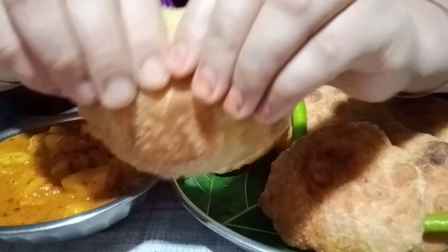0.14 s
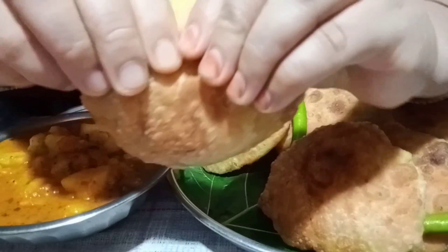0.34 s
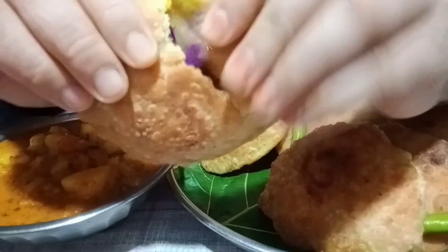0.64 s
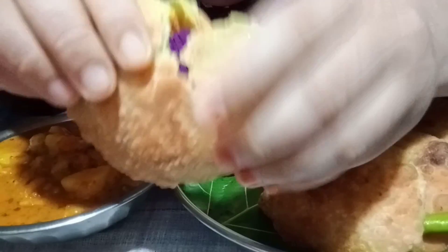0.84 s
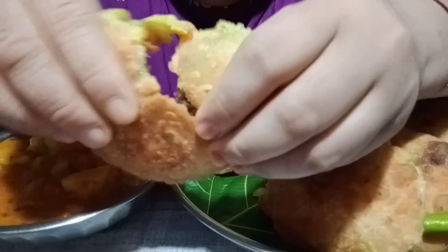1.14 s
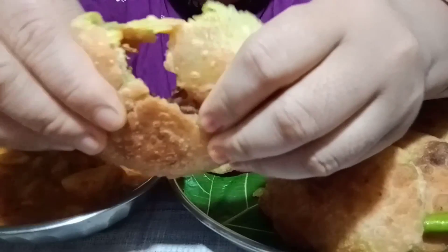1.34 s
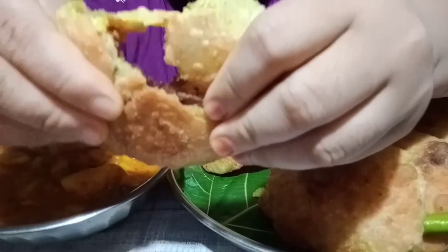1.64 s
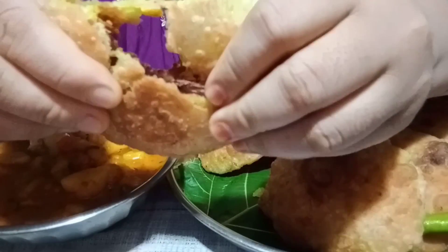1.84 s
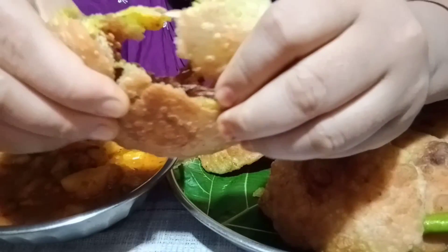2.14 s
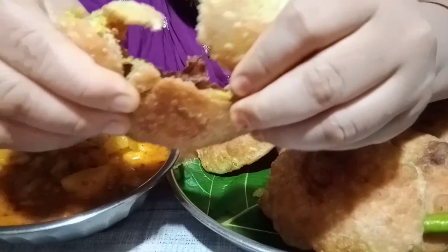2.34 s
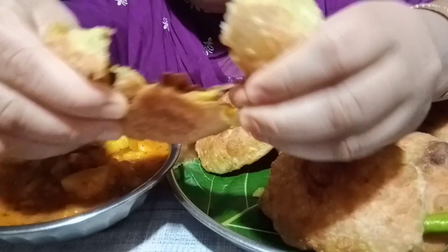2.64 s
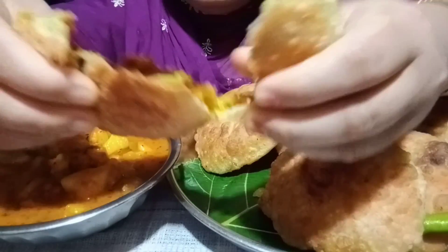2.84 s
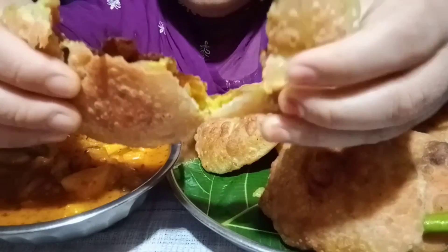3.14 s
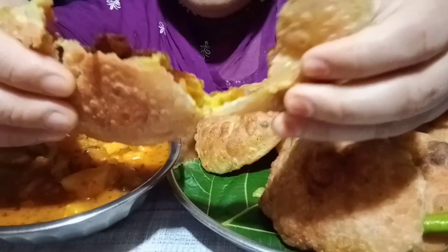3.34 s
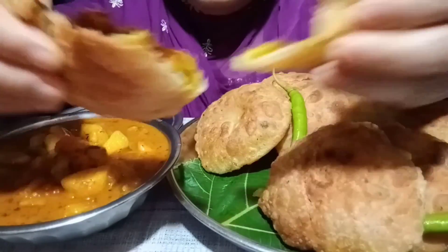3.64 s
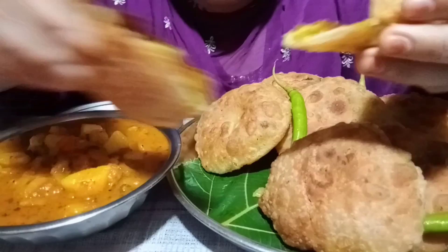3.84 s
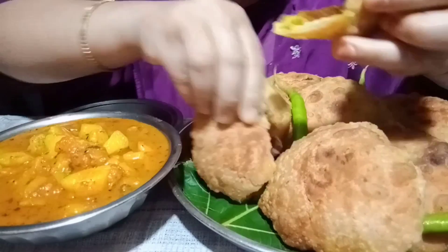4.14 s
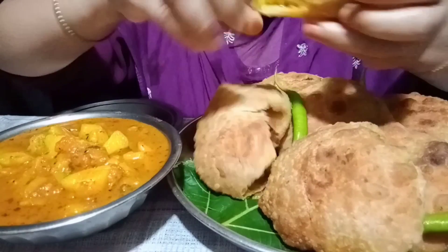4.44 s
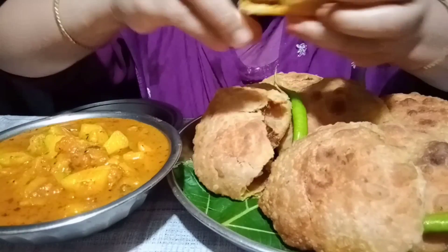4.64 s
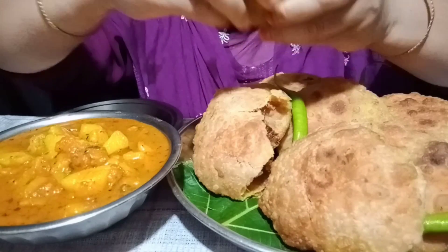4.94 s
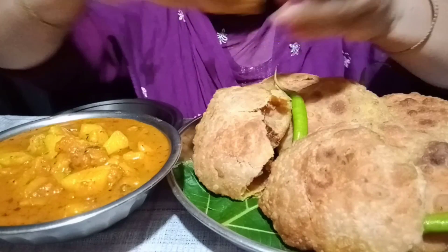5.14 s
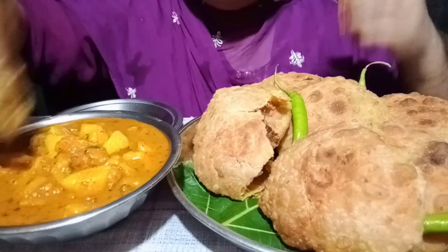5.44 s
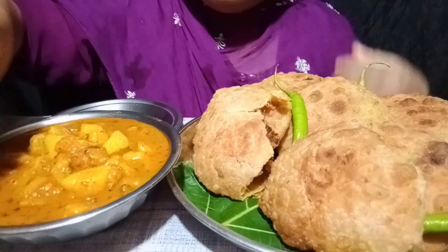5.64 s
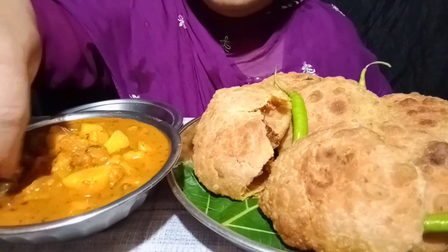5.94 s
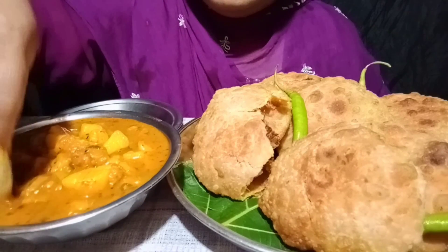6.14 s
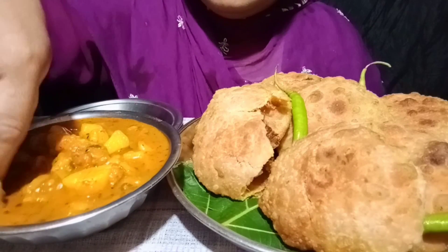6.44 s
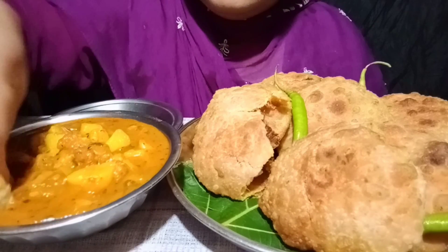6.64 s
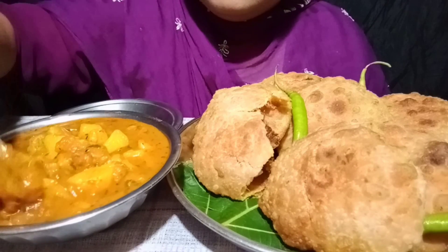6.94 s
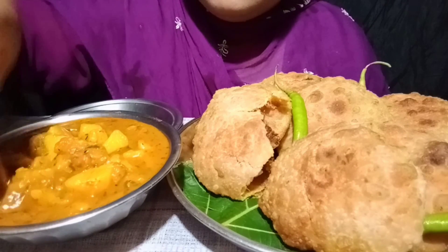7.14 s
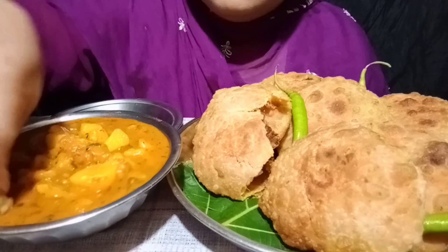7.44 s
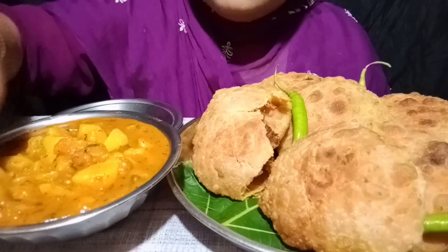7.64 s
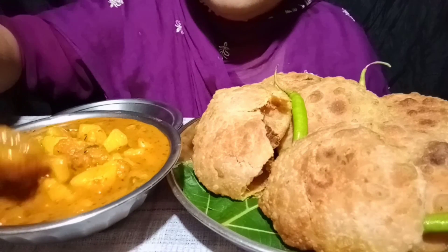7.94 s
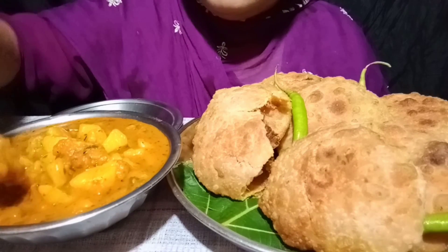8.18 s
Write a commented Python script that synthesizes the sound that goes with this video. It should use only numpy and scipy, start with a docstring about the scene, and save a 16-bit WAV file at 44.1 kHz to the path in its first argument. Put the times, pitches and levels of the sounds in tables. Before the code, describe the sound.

Crisp fried pastry is torn by hand with sharp, close crackles, then softer rustles over a low engine rumble and faint sparrows.

```python
"""Hands tear a crisp fried pastry close to a microphone: brittle fracture makes the crust snap and crackle,
air rings inside the puffed shell, and friction hisses as a piece is laid down and rubbed.
Outside, an engine slowly gathers speed, its harmonics rising through fixed resonances, and far
sparrows chirp. The room booms and thumps softly, and a hollow space sings near 1.25 kHz."""
import sys
import numpy as np
from scipy import signal
from scipy.fft import rfft, irfft, next_fast_len
from scipy.io import wavfile
from scipy.ndimage import uniform_filter1d, map_coordinates

SR = 44100
rng = np.random.default_rng(int(sys.argv[2]) if len(sys.argv) > 2 else 0)


def materialize(psi):
    """Save the field psi as 16-bit PCM at rate SR to the path in sys.argv[1].

    A 1-D psi becomes a single channel; in a 2-D psi each row is a channel.
    """
    bounded = np.clip(np.atleast_2d(psi).T, -1, 1)
    quanta = np.round(bounded * 32767).astype(np.int16)
    wavfile.write(sys.argv[1], SR, quanta)


N = 366471

# How hard the crust is bent. Each row: time in seconds, crackle level in dB.
BENDING = [(0, -39), (.11, -38.5), (.25, -42.5), (.39, -50.5), (.58, -44), (.67, -59.5), (.79, -65),
           (.9, -53.5), (1.11, -54), (1.2, -49), (1.35, -52), (1.47, -45), (1.55, -58), (1.65, -55),
           (1.83, -69.5), (1.94, -49.5), (2.07, -59), (2.33, -51), (2.43, -59), (2.59, -63), (3.28, -70.5),
           (4.0, -67.5), (4.16, -51.5), (4.3, -48), (4.36, -58), (4.74, -69.5), (5.32, -71), (5.6, -63),
           (6.41, -73), (6.7, -61.5), (6.99, -69), (8.2, -69.5), (8.31, -59.5)]


def amp(db):
    """Decibels as an amplitude ratio."""
    return 10 ** (np.asarray(db) / 20)


def unit(x):
    """Normalisation to an rms of 1."""
    return x / np.sqrt(np.mean(x ** 2) + 1e-20)


def along(points, hz):
    """Interpolation of (Hz, value) points on a logarithmic frequency axis."""
    f, v = np.transpose(points)
    return np.interp(np.log(hz + 1), np.log(f + 1), v)


def curves(rows):
    """Linear interpolation: one value per sample for each column after the time."""
    times, *columns = np.transpose(rows)
    return [np.interp(np.arange(N) / SR, times, column) for column in columns]


def wobble(rate, size=16):
    """Smooth random modulation: a spline through `rate` knots a second."""
    coarse = np.arange(0, N + size, size)
    knots = rng.standard_normal(int(N * rate / SR) + 4)
    return np.interp(np.arange(N), coarse, map_coordinates(knots, [coarse * rate / SR]))


def swells(rows):
    """Hann envelopes: each row swells and fades over its length, one gain curve per dB column."""
    out = np.zeros((len(rows[0]) - 2, N + SR))
    for start, length, *db in rows:
        size = int(length * SR)
        out[:, round(start * SR):][:, :size] += amp(db)[:, None] * np.hanning(size)
    return out[:, :N]


def filtered(x, response):
    """Linear filtering: the spectrum is multiplied by a function of frequency."""
    size = next_fast_len(N + SR // 2)
    return irfft(rfft(x, size) * response(np.fft.rfftfreq(size, 1 / SR)), size)[..., :N]


def causal(x, points, size=4096):
    """Minimum-phase filtering by (Hz, dB) points: ringing follows its cause and never precedes it."""
    cepstrum = irfft(np.log(amp(along(points, np.fft.rfftfreq(size, 1 / SR)))), size)
    cepstrum[1:size // 2] *= 2
    cepstrum[size // 2 + 1:] = 0
    kernel = irfft(np.exp(rfft(cepstrum)), size)
    return signal.fftconvolve(np.atleast_2d(x), kernel[None], axes=1)[:, :N]


def narrow(hz, width_hz):
    """Narrow-band noise of rms 1: a carrier with random amplitude and phase."""
    sway = wobble(width_hz) + 1j * wobble(width_hz)
    return unit(np.real(sway * np.exp(2j * np.pi * hz * np.arange(N) / SR)))


def grains(rate, life_s, spread_db):
    """Shot noise of rms 1: clumped impulses each release a decaying burst of white noise."""
    hits = rng.random(N) < rate / SR * amp(4 * wobble(25))
    strengths = amp(spread_db * rng.exponential(size=N))
    envelope = signal.lfilter([1], [1, -np.exp(-1 / (life_s * SR))], hits * strengths)
    return unit(envelope * rng.standard_normal(N))


def room_tone():
    """Ambient noise in drifting patches; its coherence between left and right falls in the treble."""
    # The quiet room. Each row: frequency in Hz, relative spectral density in dB.
    spectrum = [(15, -41), (25, -15), (76, -10.5), (108, -0.5), (236, -22.5), (344, -15.5), (416, -22),
                (1020, -25), (1260, -22.5), (1560, -29.5), (1840, -29), (5880, -35.5), (9070, -52.5),
                (14800, -37), (16000, -59.5)]
    # Likeness of the channels. Each row: frequency in Hz, correlation from 0 to 1.
    coherence = [(30, 0.84), (100, 1), (400, 0.96), (1000, 0.89), (3800, 0.44), (15000, 0.18)]

    def mid_and_side(hz):
        angle = np.arccos(np.clip(along(coherence, hz), -1, 1)) / 2
        return amp(along(spectrum, hz)) * [np.cos(angle), np.sin(angle)]

    cells = signal.stft(rng.standard_normal((2, N)), nperseg=512)[2]
    patches = uniform_filter1d(rng.standard_normal(cells.shape[1:]), size=4, axis=0)
    patches = uniform_filter1d(patches, size=12, axis=1)
    noise = signal.istft(cells * amp(4.15 * unit(patches)), nperseg=512)[1][:, :N]
    mid, side = filtered(noise, mid_and_side)
    return amp(-51.5) * unit(np.array([mid + side, mid - side]))


def hollow_note():
    """Cavity resonance: a hollow space sings in two fluttering bands of noise."""
    # Strength of the note. Each row: time in seconds, level in dB before the flutter.
    strength = [(0.0, -58), (0.69, -74), (1.13, -63.5), (1.85, -72), (3.26, -57.5), (3.82, -64), (4.4, -47),
                (4.58, -63.5), (4.88, -63), (6.04, -58), (6.27, -61), (8.08, -63), (8.31, -70)]
    level = amp(curves(strength)[0])
    flutter = amp(5.6 * wobble(21) + 1.5 * wobble(5.7))
    mid = narrow(1250, width_hz=140) + 0.21 * narrow(1850, width_hz=250)
    side = amp(-17) * narrow(1250, width_hz=140)
    return level * flutter * np.array([mid + side, mid - side])


def chirps_and_whistles(yard_t60_s=0.26):
    """Frequency glides that level off, made raspy by amplitude modulation and smeared by echoes; two of the
    rows are faint near-steady whistles that ring near 3.4 and 3.8 kHz."""
    # Far chirps, and two faint near-steady whistles (the rows at 3.908 s and 4.558 s). Each row: start and
    # length in seconds, first and last pitch in Hz, relative level in dB.
    chirps = [(3.605, 0.042, 5900, 4600, -58), (3.908, 0.12, 3810, 3910, -61.5),
              (4.55, 0.061, 5900, 5920, -57), (4.558, 0.09, 3480, 3340, -61),
              (4.671, 0.068, 6440, 4280, -57.5), (5.827, 0.037, 3470, 3595, -61),
              (5.863, 0.089, 6440, 5630, -53.5), (6.529, 0.081, 4520, 4710, -59),
              (6.604, 0.07, 6580, 5640, -49.5), (7.443, 0.097, 5360, 6010, -57),
              (7.893, 0.082, 6320, 5630, -49), (8.21, 0.033, 5420, 5410, -56)]
    # Upper partials. Each row: multiple of the pitch, relative level in dB.
    overtones = [(5 / 3, -15), (7 / 3, -18)]
    calls = np.zeros(N + SR)
    for start, length, first_hz, last_hz, db in chirps:
        progress = np.arange(int(length * SR)) / (length * SR)
        pitch_hz = last_hz + (first_hz - last_hz) * (1 - progress) ** 1.6
        phase = 2 * np.pi * np.cumsum(pitch_hz) / SR
        tone = np.sin(phase) + sum(amp(gain_db) * np.sin(k * phase) for k, gain_db in overtones)
        calls[round(start * SR):][:len(tone)] += amp(db) * np.sin(np.pi * progress) ** .5 * tone
    raspy = calls[:N] * (.8 + wobble(320))
    t = np.arange(SR // 4) / SR
    yard = rng.standard_normal(len(t)) * amp(-60 * t / yard_t60_s)
    return .5 * raspy + signal.fftconvolve(raspy, yard / np.linalg.norm(yard))[:N]


def engine(step=32, strong_order=4, strong_db=3.5):
    """Forced vibration: orders 2-12 of the firing rate rise through deep and upper fixed resonances."""
    # Engine speed. Each row: time in seconds, firing rate in Hz.
    speed = [(0, 16.8), (1, 16.9), (2.5, 17.2), (3, 17.6), (3.5, 19), (4, 20.5), (4.5, 21.5), (5, 22.6),
             (5.5, 23.7), (6, 25.2), (6.3, 26.1), (7, 25.9), (7.5, 26.3), (8.31, 27)]
    # The two sets of resonances. Each row: frequency in Hz, relative gain in dB.
    deep_body = [(30, -30), (50, -10), (68, -4.5), (89, 2), (106, -1), (125, -4), (140, -34)]
    upper_body = [(120, -29), (140, 1), (152, 5.5), (168, -7), (190, -7), (206, -12.5), (260, -29.5)]
    firing_hz = (curves(speed)[0] * (1 + 0.0037 * wobble(12)))[::step]
    order = np.arange(2, 13)[:, None]
    phase = 2 * np.pi * (order * np.cumsum(firing_hz) * step / SR + rng.random(order.shape))
    drift_db = 1.8 * np.array([wobble(5)[::step] for _ in order])
    partials = amp(drift_db + strong_db * (order == strong_order)) * np.sin(phase)
    voices = [np.sum(partials * amp(along(body, order * firing_hz)), axis=0)
              for body in (deep_body, upper_body)]
    return [unit(signal.resample_poly(voice, step, 1)[:N]) for voice in voices]


def rumble(boom_db=-9, thump_db=-15):
    """Superposition of low sounds: the engine, and a room that booms and thumps along with it."""
    # The engine at the table. Each row: time in seconds, deep and upper level in dB.
    engine_levels = [(0, -49, -46), (.35, -50.5, -51), (.75, -54.5, -53), (.97, -57, -57.5),
                     (1.05, -47.5, -44.5), (1.3, -55.5, -45.5), (1.48, -59, -53.5), (1.63, -53.5, -45.5),
                     (1.78, -53, -58), (2.4, -51, -46.5), (2.75, -43.5, -53), (3.1, -44.5, -57),
                     (3.7, -47, -58), (4.38, -44.5, -57.5), (4.46, -41.5, -59), (5.35, -40, -58),
                     (5.5, -44.5, -53), (6.4, -49, -52.5), (7.42, -44, -57), (7.57, -37, -41),
                     (7.75, -39.5, -48), (8.2, -43.5, -57.5), (8.31, -30.5, -50)]
    # Dull thuds and swells. Each row: start and length in seconds, relative boom and thump level in dB.
    thuds = [(.13, 0.17, -62, -48.5), (.76, 0.091, -42, -80), (.88, 0.053, -65, -47),
             (1.17, 0.082, -38, -77), (1.57, .1, -39, -80), (2.66, 0.1, -41, -57), (3.24, 0.21, -45, -46),
             (3.88, 0.066, -31.5, -50.5), (4.05, 0.086, -32.5, -54), (4.24, 0.075, -55, -44),
             (4.44, .14, -34, -82), (4.72, 0.13, -51, -53.5), (5.11, 0.072, -32.5, -67),
             (5.78, 0.23, -54, -53.5), (6.13, 0.16, -47.5, -47), (6.3, 0.14, -62, -47),
             (6.5, 0.25, -46, -50), (6.88, .2, -43, -47), (7.16, 0.16, -46, -54), (7.44, 0.14, -60, -37),
             (7.53, 0.14, -29.5, -43.5), (8.06, 0.14, -36.5, -66)]
    # Spectrum of the thumping. Each row: frequency in Hz, relative gain in dB.
    thump_colour = [(100, -45), (190, 6.5), (300, 2.5), (380, -8), (550, -17.5), (900, -40.5)]
    deep_db, upper_db = curves(engine_levels)
    deep, upper = engine()
    booms, thumps = swells(thuds)
    boom = narrow(89, width_hz=14) + 0.78 * narrow(106, width_hz=11)
    lumps = amp(2 * wobble(14)) * rng.standard_normal(N)
    thump = unit(causal(lumps, thump_colour)[0])
    thump_gain = amp(deep_db + thump_db + 4.7 * wobble(6)) + thumps
    engine_drift_db = 2.5 * wobble(8)
    deep_gain = amp(deep_db + engine_drift_db) + 0.44 * booms
    upper_gain = amp(upper_db + engine_drift_db) + .15 * booms
    boom_gain = amp(deep_db + boom_db + 2.5 * wobble(8)) + 0.44 * booms
    return deep_gain * deep + upper_gain * upper + boom_gain * boom + thump_gain * thump


def finger_bumps(rise_s=0.0031, t60_s=0.06):
    """Damped vibration: a soft contact sets two modes of the dough ringing for a few dull cycles."""
    # Fingers on the dough. Each row: start in seconds, relative level in dB, lower mode in Hz.
    contacts = [(0.89, -37.5, 370), (2.64, -37, 404), (3.271, -34.5, 260), (3.349, -42, 312),
                (4.254, -27, 325)]
    out, t = np.zeros(N + SR), np.arange(SR // 8) / SR
    for start, db, hz in contacts:
        ring = np.sin(2 * np.pi * hz * t) + 0.43 * np.sin(2 * np.pi * (1.45 * hz * t + rng.random()))
        envelope = amp(db - 60 * t / t60_s) * (1 - np.exp(-t / rise_s))
        out[round(start * SR):][:len(t)] += envelope * ring
    return out[:N]


def flakes(hz, depth_db):
    """Chance resonances of bits of crust, as a ripple in dB across the spectrum."""
    return depth_db * np.interp(hz, np.linspace(0, SR / 2, num=56), rng.standard_normal(56))


def scrapes():
    """Sliding friction: dense tiny slips excite the flakes; each stroke swells, then stops short."""
    # A tear runs on, or a piece slides on pastry or cloth. Each row: start and length in seconds,
    # hiss in dB, brightest frequency in Hz, top edge in dB relative to it, dull rub in dB,
    # crest of the stroke as a share of its length.
    slides = [(0.638, 0.075, -40.5, 6200, -20, -77, 0.84), (0.836, 0.12, -57, 6550, -20, -77, 0.96),
              (0.94, 0.052, -50, 5960, -31, -63, 0.35), (0.272, 0.015, -21.5, 6600, -23, -39, .25),
              (1.42, 0.11, -38, 6600, 2, -56, 0.14), (2.258, 0.056, -36, 7600, 3, -56, .1),
              (2.672, 0.045, -60, 6900, -22, -66, .2), (3.505, 0.18, -57.5, 6860, -17.5, -73, 0.45),
              (3.935, 0.053, -48, 7040, -28, -69, 1), (4.041, 0.065, -43, 6240, -19, -45.5, .15),
              (4.135, 0.045, -45, 5970, -23, -50, 0.23), (4.202, 0.16, -42, 5400, -33, -44.5, 0.3),
              (4.39, 0.16, -36, 7700, -16, -37, 0.66), (5.358, 0.092, -54, 4950, -20, -71, 0.4),
              (5.47, 0.087, -55, 4850, -22, -59.5, 0.68), (5.57, 0.085, -56.5, 4400, -26, -77, 0.62),
              (6.076, 0.061, -58, 5540, -21, -70, 0.36), (7.042, 0.089, -58, 5000, -17, -70, 0.61),
              (7.177, 0.073, -61, 6260, -20.5, -67, 0.48)]
    # Spectrum of rubbed dough. Each row: frequency in Hz, relative gain in dB.
    dough = [(200, -22), (350, -22), (800, -6), (1000, 11), (1500, 16), (2100, 8), (2800, -4.5),
             (5000, -87)]
    out = np.zeros(N + SR)
    grit = grains(1200, life_s=0.0018, spread_db=0.5) + 0.63 * rng.standard_normal((2, N))
    rub = unit(causal(grit[1], dough)[0])
    for start, length, hiss_db, peak_hz, edge_db, rub_db, crest in slides:
        first, size = round(start * SR), int(length * SR)
        span = slice(first, first + size)
        hz = np.fft.rfftfreq(size, 1 / SR)
        colour = [(1000, -35), (0.47 * peak_hz, -7), (peak_hz, 0), (1.45 * peak_hz, -10),
                  (13500, edge_db)]
        gain = amp(along(colour, hz) + flakes(hz, depth_db=5.5))
        hiss = unit(irfft(rfft(grit[0, span]) * gain, size))
        progress = np.linspace(0, 1, size)
        stroke = np.interp(progress, [0, np.clip(crest, .05, .9), .93, 1], [0.16, 0.97, 0.32, 0.18])
        out[span] += stroke * (amp(hiss_db) * hiss + amp(rub_db) * rub[span])
    return out[:N]


def shell_note(shell_db=-12):
    """Cavity resonance: tiny taps ring the air in the puffed shell as it is bent or squeezed."""
    # Response of the enclosed air. Each row: frequency in Hz, relative gain in dB.
    cavity = [(200, -26), (340, -6), (450, -14.5), (560, -8), (680, -7), (780, 4.5), (950, -11),
              (1500, -21.5)]
    # Fingers press the shell. Each row: start and length in seconds, level in dB.
    squeezes = [(.01, 0.083, -33.5), (.18, 0.047, -28.5), (.46, 0.13, -47), (.55, 0.091, -44.5),
                (.93, 0.068, -43), (1.21, 0.073, -55), (1.41, 0.096, -46), (1.58, 0.035, -41.5),
                (1.91, 0.085, -62), (2.23, 0.065, -53), (2.33, 0.055, -45), (2.63, 0.12, -52),
                (3.95, 0.093, -52), (4.13, 0.07, -47), (4.23, 0.12, -35.5), (4.42, 0.16, -45.5)]
    taps = grains(160, life_s=0.0051, spread_db=1.5) + 0.23 * rng.standard_normal(N)
    level = amp(curves(BENDING)[0] + shell_db + 2.4 * wobble(9)) + swells(squeezes)[0]
    return level * unit(causal(taps, cavity)[0])


def crackle():
    """Acoustic emission: flexing crust gives a fine crackle, spikier the harder it is bent."""
    # Spectrum of the crust. Each row: frequency in Hz, relative gain in dB.
    crust = [(900, -36.5), (2000, -8), (4000, -3.5), (7000, 2.5), (10000, -6), (13000, -10), (16000, -10)]
    level_db, = curves(BENDING)
    force = np.clip((level_db + 74.5) / 16, 0, 1)
    spikes = force * grains(700, life_s=.002, spread_db=3.5)
    hiss = (1 - .65 * force) * rng.standard_normal(N)
    return amp(level_db + 2.5 * wobble(9.7)) * unit(causal(spikes + hiss, crust)[0])


def small_fractures(per_second=45):
    """A random point process: rows of lesser snaps, louder the harder the crust is bent."""
    when, strength, pitch, knock, edge = rng.random((round(per_second * N / SR), 5)).T
    start = when * N / SR
    db = np.interp(start, *np.transpose(BENDING)) + 12.5 - 3 * np.log(strength + 0.0012)
    peak_hz = 6450 * 2 ** (.5 * pitch - .25)
    return zip(start, db, peak_hz, -45 + 20 * knock, -33.5 + 20 * edge)


def snaps(rise_s=.0004, burst_t60_s=.010, tail_t60_s=0.041):
    """Brittle fracture: each crack is a sharp burst, brightest where the flake rings."""
    # The main cracks. Each row: start in seconds, relative level in dB, brightest frequency in Hz,
    # relative levels of the shell's knock and of the top edge in dB.
    fractures = [(0.0184, -13.5, 7340, -17.5, -24.5), (0.0254, -16, 7200, -16.5, -30.5),
                 (0.0363, -10.5, 6600, -27, -35), (0.0624, -22, 7350, -13, -19.5),
                 (0.0792, -23, 7200, -20, -24.5), (0.0914, -23.5, 7640, -13.5, -26),
                 (0.1067, -14.5, 4720, -27, -25.5), (0.1264, -15, 6340, -21, -26.5),
                 (0.1344, -10.5, 4300, -25.5, -19.5), (0.1421, -3.5, 6900, -43, -29.5),
                 (0.1504, -16, 7490, -18.5, -19.5), (0.1835, 1, 5650, -32, -34),
                 (0.1904, -9.5, 6000, -30, -23), (0.2059, -1, 6170, -34.5, -25.5),
                 (0.2174, -7, 7640, -34, -24), (0.2473, -15.5, 7410, -32.5, -26.5),
                 (0.2684, -14, 7450, -33.5, -23.5), (0.2733, -10.5, 6100, -35, -24),
                 (0.2964, -23, 6130, -29, -26.5), (0.3254, -25.5, 7330, -22, -14),
                 (0.3381, -15, 5700, -21.5, -16.5), (0.3581, -27, 7300, -16, -22.5),
                 (0.38, -32.5, 7530, -19, -26.5), (0.4379, -8, 7100, -35.5, -28.5),
                 (0.4733, -12, 7940, -28, -24.5), (0.5092, -19.5, 4310, -31, -30.5),
                 (0.5362, -20, 7240, -25, -18.5), (0.5666, -19, 7550, -22, -28),
                 (0.5784, -24.5, 5570, -20, -26), (0.613, -18, 7000, -27, -31),
                 (0.7841, -52, 7330, -23, -26), (0.9108, -35, 7130, -21, -17),
                 (0.9413, -24, 7100, -31, -29), (1.051, -32.5, 5800, -29, -23.5),
                 (1.1984, -30, 6330, -33, -24), (1.2241, -37, 7360, -27, -28),
                 (1.2321, -26.5, 7450, -27, -25), (1.2491, -22.5, 7300, -19, -33),
                 (1.2965, -24, 7150, -23, -26), (1.3583, -21.5, 5900, -23, -24),
                 (1.3838, -18, 6270, -41, -20), (1.4022, -28.5, 7400, -34, -24),
                 (1.4247, -9.5, 6240, -43, -23), (1.4314, -12, 6370, -21, -18),
                 (1.4374, -14, 6700, -32, -19.5), (1.4654, -17.5, 6350, -33, -21.5),
                 (1.4845, -22.5, 7560, -47, -17.5), (1.5045, -23, 5800, -34, -23),
                 (1.5873, -7.5, 8900, -20, -22.5), (1.6207, -25, 7300, -15, -23),
                 (1.6741, -30, 6100, -25, -18), (1.7025, -18.5, 7500, -28, -8.5),
                 (1.9091, -23, 6050, -31, -22.5), (1.9255, -20, 7000, -32, -27),
                 (1.9455, -25, 5960, -27.5, -22), (1.9674, -22, 7560, -34, -25),
                 (1.9919, -24.5, 7650, -34, -24), (2.0428, -26, 6200, -41, -24),
                 (2.0887, -9, 6400, -25, -17), (2.1326, -29.5, 7550, -48, -21),
                 (2.1695, -24.5, 6250, -43, -17), (2.1989, -29.5, 7080, -34, -18.5),
                 (2.2114, -16, 6200, -22, -24), (2.2343, -32, 7070, -32, -22),
                 (2.2564, -22.5, 7050, -17, 4), (2.2638, -4, 8200, -25.5, -16),
                 (2.2804, -26, 5750, -24, -21), (2.3101, -23, 7340, -40, -24.5),
                 (2.3361, -22.5, 6200, -30, -15.5), (2.355, -13.5, 6040, -32, -15.5),
                 (2.3745, -22, 7140, -34, -22), (2.4977, -25, 9900, -35, -7), (2.8185, -41, 6240, -22, -32),
                 (3.252, -37.5, 7300, -14, -33), (3.6356, -36, 5610, -17, -30),
                 (4.1535, -18.5, 8200, -23, -19.5), (4.3954, -32, 4490, -5, -26),
                 (4.4109, -28, 4430, -5, -28), (6.0394, -47, 5930, -13, -9), (6.6877, -28, 3700, -42, -27),
                 (6.6934, -34, 7400, -21, -18), (6.7406, -41, 6070, -14, -15),
                 (6.765, -30.5, 3700, -44, -22), (6.7895, -45, 7600, -25, -11),
                 (6.8219, -27, 7160, -21, -28), (6.9282, -40, 7230, -8, -34), (7.4574, -34, 4960, -21, -34),
                 (7.5273, -33, 5800, -20, -30), (8.2546, -33, 5350, -22, -6),
                 (8.2861, -26, 8060, -33, -25.5), (8.2964, -25, 4540, -30, -28)]
    out, t = np.zeros(N + SR), np.arange(1024) / SR
    hz = np.fft.rfftfreq(len(t), 1 / SR)
    bass_cut_db = along([(150, -30), (700, 0)], hz)  # thin crust radiates little bass
    rise = 1 - np.exp(-t / rise_s)
    decay = amp(-60 * t / burst_t60_s) + amp(-15.5 - 60 * t / tail_t60_s)
    for start, db, peak_hz, knock_db, edge_db in [*fractures, *small_fractures()]:
        colour = [(1200, knock_db + 8), (0.76 * peak_hz, -11), (peak_hz, 0), (1.286 * peak_hz, -10),
                  (13500, edge_db + 9.5)]
        gain = amp(along(colour, hz) + bass_cut_db + flakes(hz, depth_db=3.5))
        noise = unit(irfft(rfft(rng.standard_normal(len(t))) * gain))
        # The crack front runs in fits.
        fits = amp(2.04 * unit(uniform_filter1d(rng.standard_normal(len(t)), size=24)))
        out[round(start * SR):][:len(t)] += amp(db - 3.5) * noise * fits * rise * decay
    return out[:N]


def reverberation(x, side_db, delay_samples=150):
    """Wall reflections form a tail in which each frequency decays at its own rate."""
    # Decay of the room. Each row: frequency in Hz, time to fall 60 dB in seconds.
    decay_times = [(300, 0.75), (2500, 0.2), (7000, 0.21), (15000, 0.14)]
    hz, t, cells = signal.stft(rng.standard_normal((2, SR // 3)), SR, nperseg=256)
    decay = amp(-60 * t / along(decay_times, hz)[:, None])
    mid, side = signal.istft(cells * decay, SR, nperseg=256)[1]
    tail = np.array([mid + amp(side_db) * side, mid - amp(side_db) * side]) / np.linalg.norm(mid)
    return signal.fftconvolve(np.pad(x, (delay_samples, 0))[None], tail, axes=1)[:, :N]


def scene():
    """Superposition in stereo: the close pastry, its reflections and the background."""
    pastry = snaps() + crackle() + shell_note() + scrapes() + finger_bumps()
    far = rumble() + hollow_note() + chirps_and_whistles()
    return pastry + amp(-14) * reverberation(pastry, side_db=-45) + far + room_tone()


def record(dry, band_limit_hz=16820):
    """Resonances of the microphone port colour the treble; peaks past full scale clip before a low-pass."""
    # Response of the port. Each row: frequency in Hz, gain in dB.
    port = [(4000, -1), (5400, -0.5), (6150, 1.5), (6600, -9), (7000, 1), (7500, 2), (8600, -4.5),
            (10600, -5.5), (11300, -2), (12000, -7), (13500, -10), (15100, -3), (15600, 3.5), (15900, -28),
            (16800, -40)]
    clipped = np.clip(causal(dry, port), -1, 1)
    return .99 * filtered(clipped, lambda hz: hz < band_limit_hz)


dry = scene()
out = record(dry)
materialize(out)
```